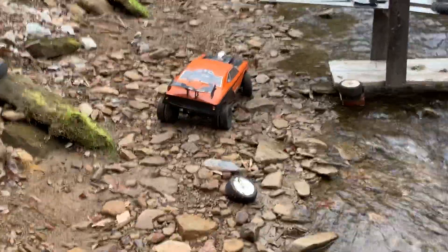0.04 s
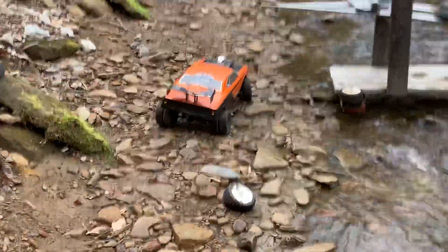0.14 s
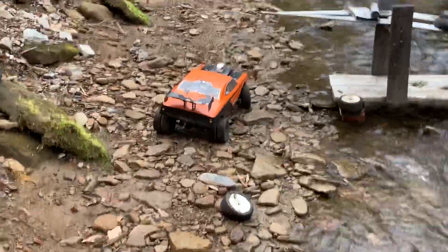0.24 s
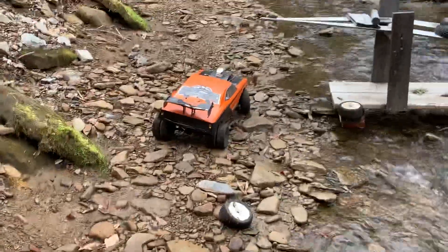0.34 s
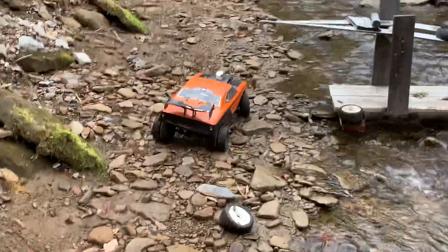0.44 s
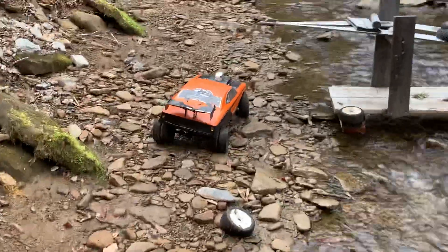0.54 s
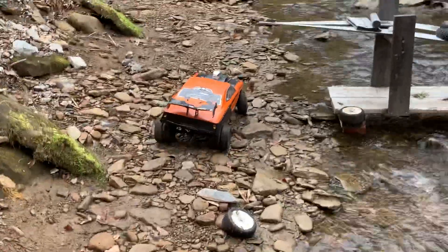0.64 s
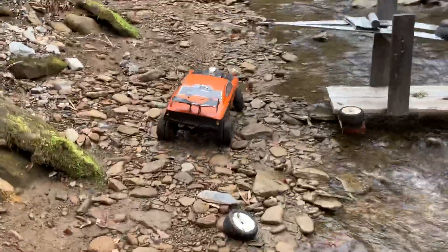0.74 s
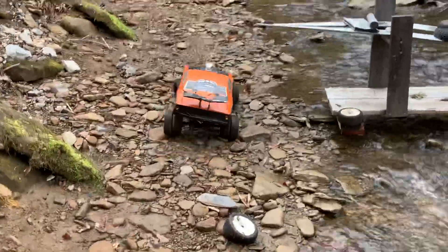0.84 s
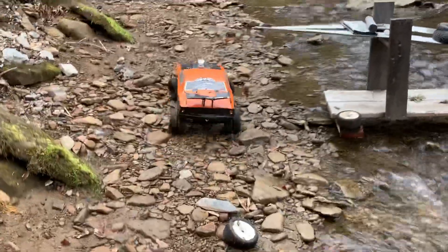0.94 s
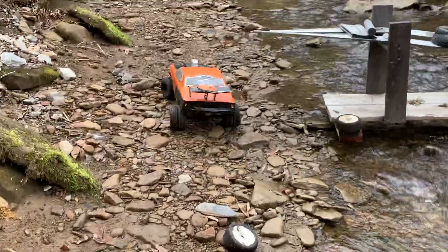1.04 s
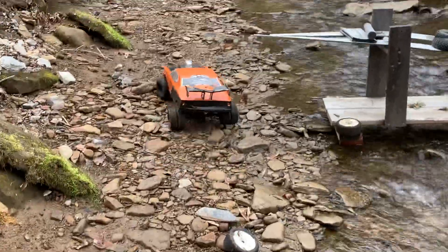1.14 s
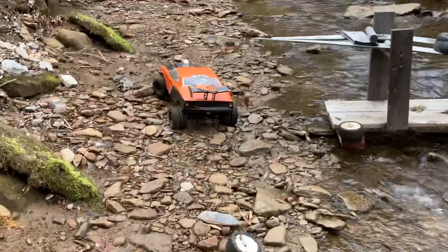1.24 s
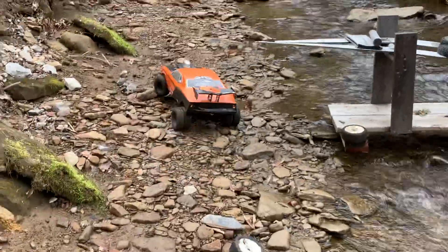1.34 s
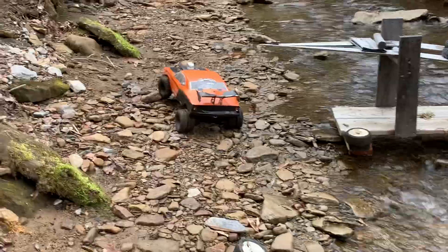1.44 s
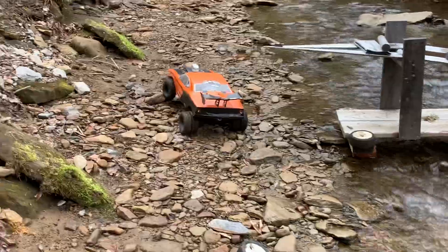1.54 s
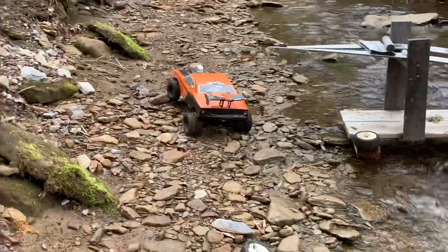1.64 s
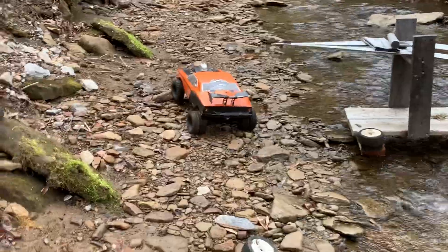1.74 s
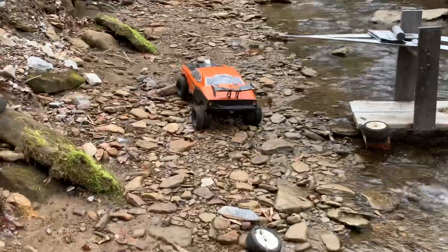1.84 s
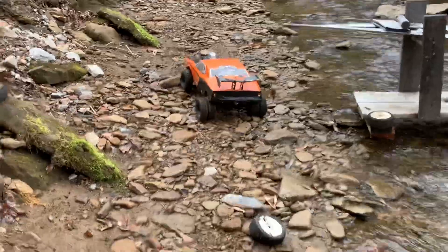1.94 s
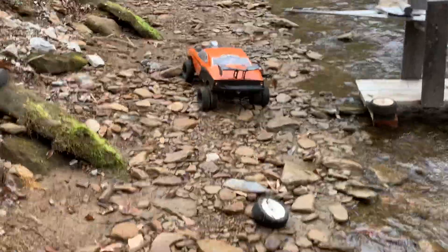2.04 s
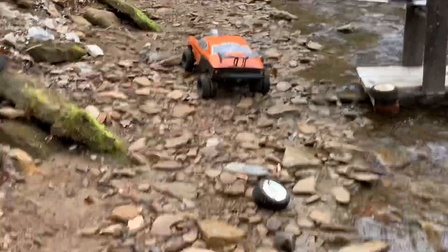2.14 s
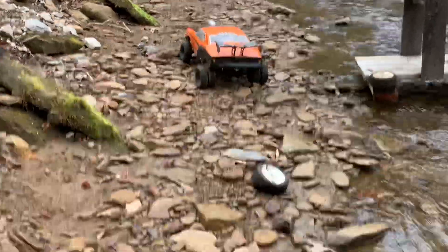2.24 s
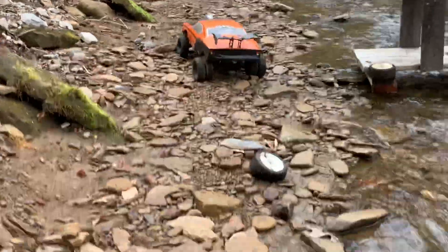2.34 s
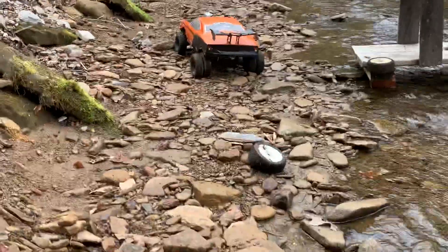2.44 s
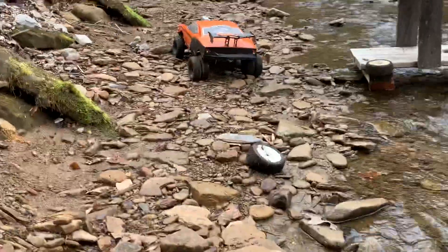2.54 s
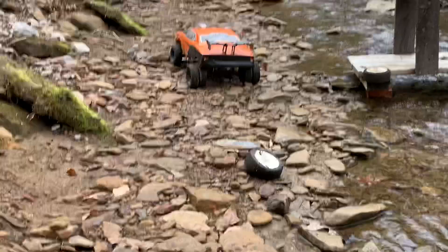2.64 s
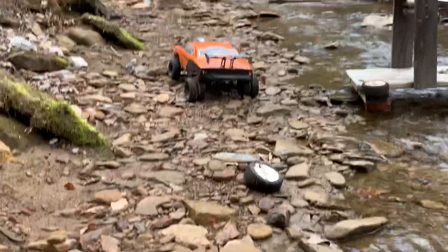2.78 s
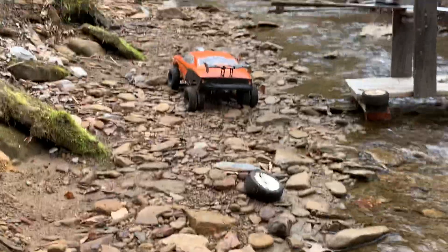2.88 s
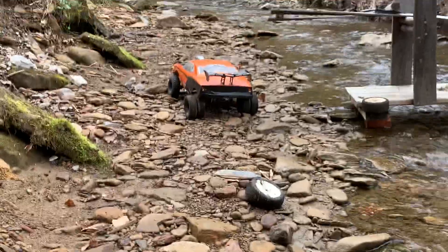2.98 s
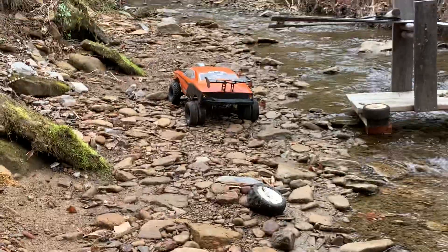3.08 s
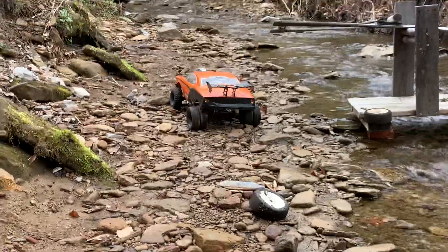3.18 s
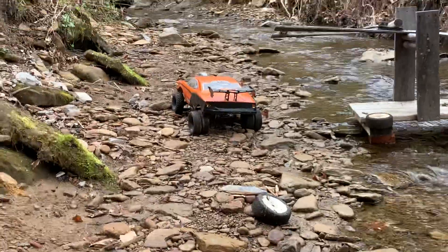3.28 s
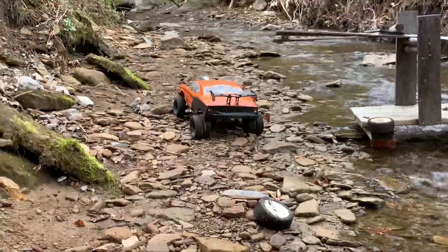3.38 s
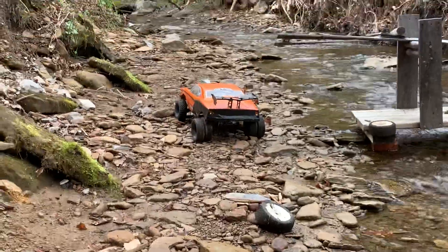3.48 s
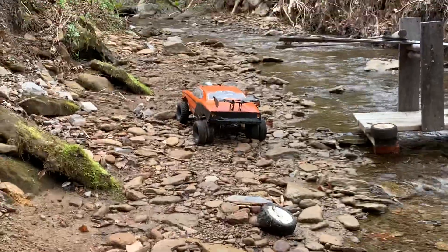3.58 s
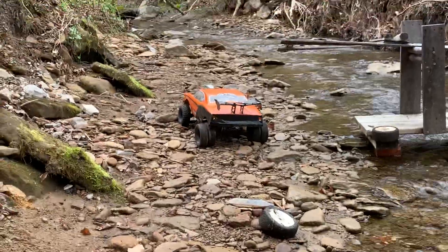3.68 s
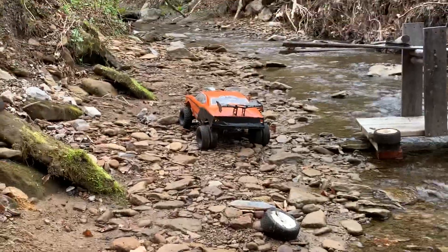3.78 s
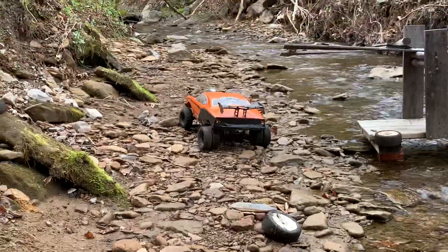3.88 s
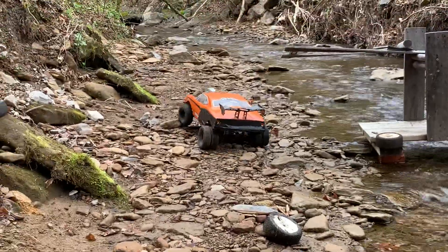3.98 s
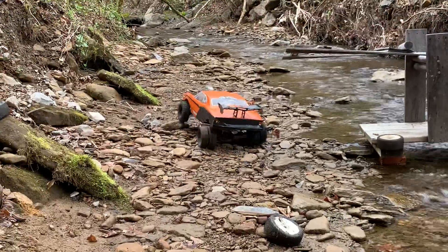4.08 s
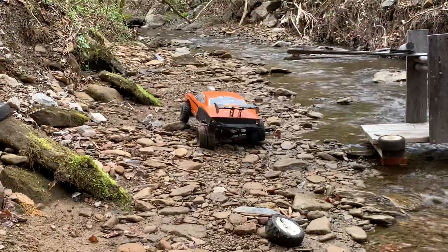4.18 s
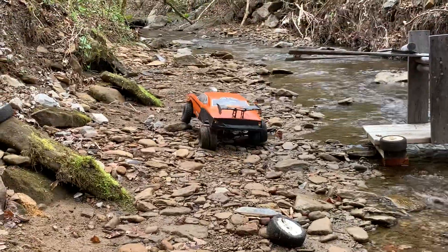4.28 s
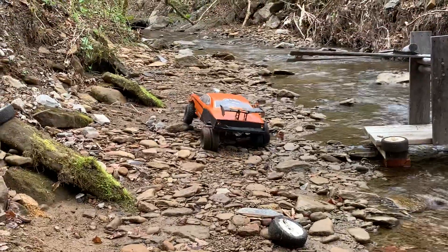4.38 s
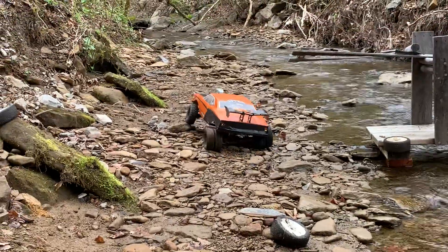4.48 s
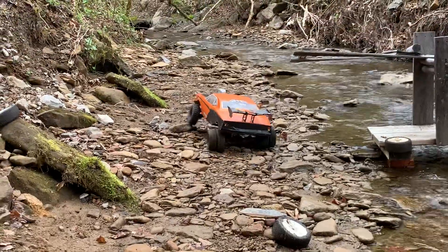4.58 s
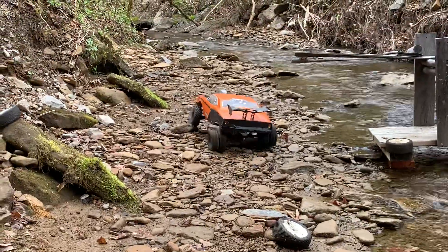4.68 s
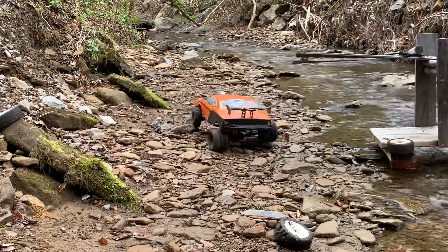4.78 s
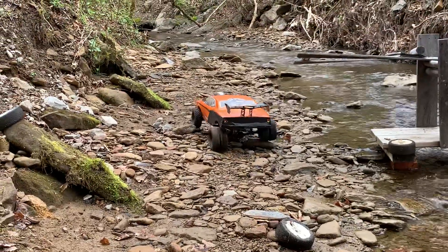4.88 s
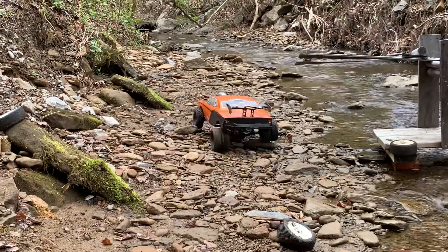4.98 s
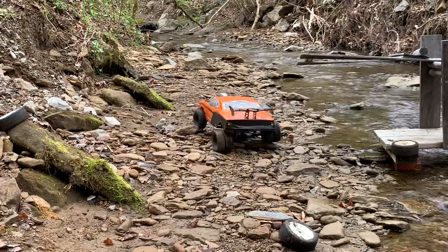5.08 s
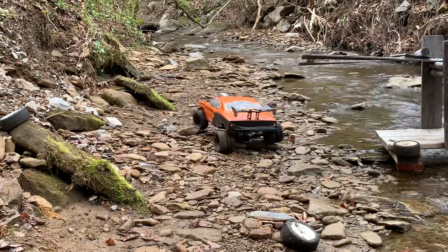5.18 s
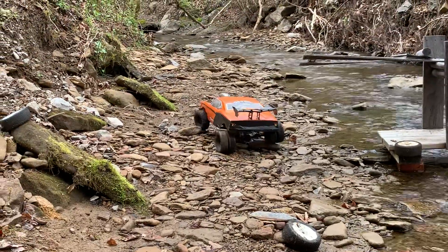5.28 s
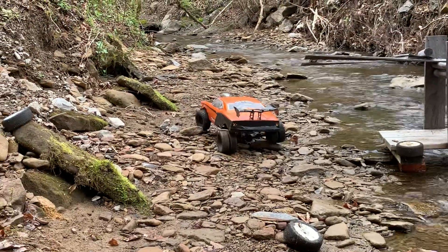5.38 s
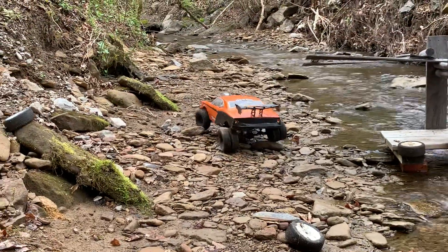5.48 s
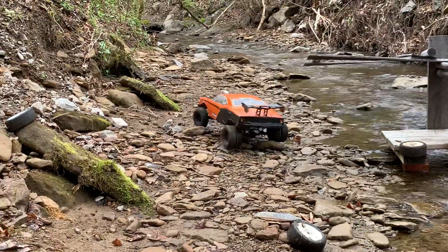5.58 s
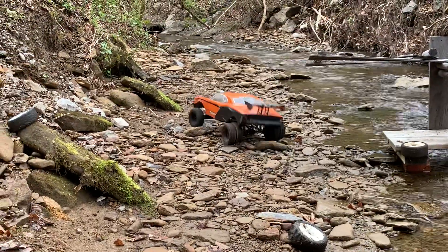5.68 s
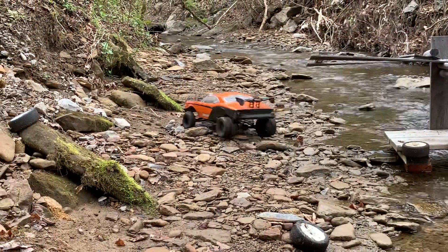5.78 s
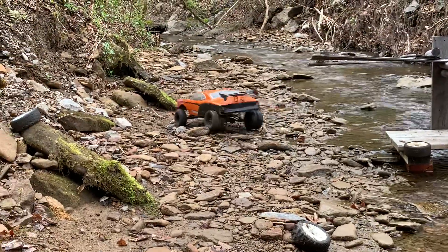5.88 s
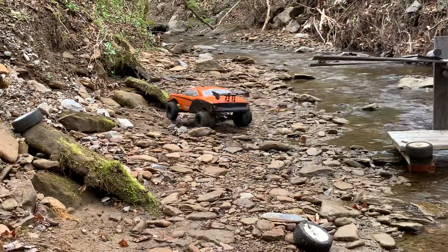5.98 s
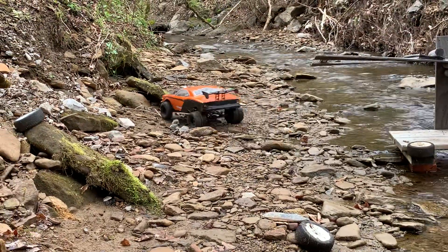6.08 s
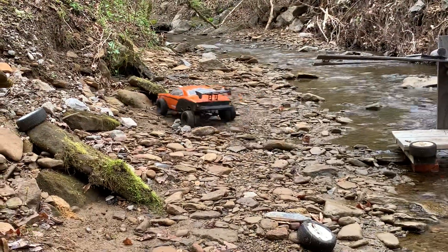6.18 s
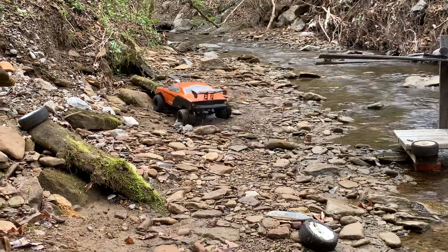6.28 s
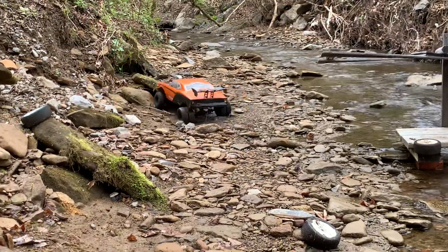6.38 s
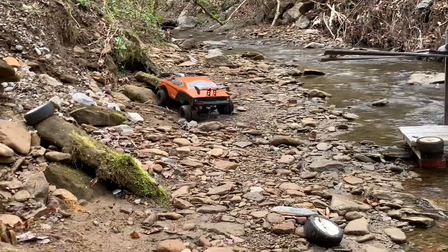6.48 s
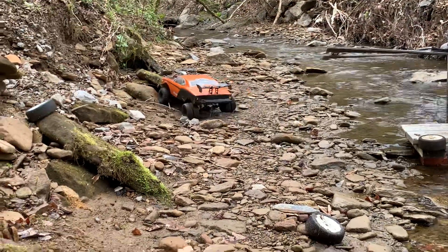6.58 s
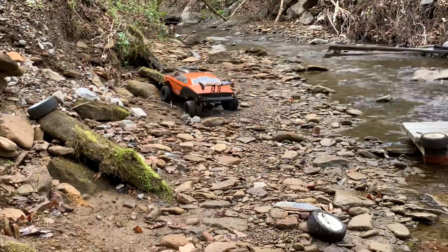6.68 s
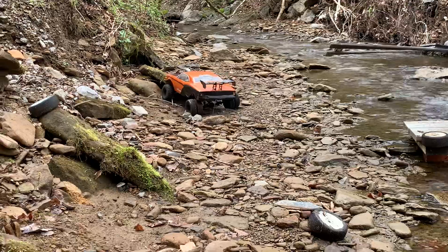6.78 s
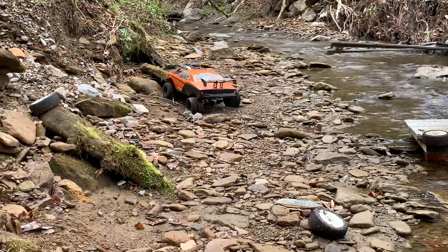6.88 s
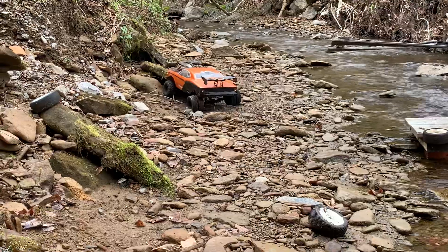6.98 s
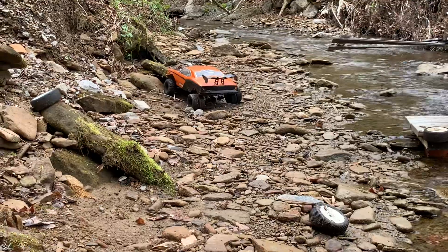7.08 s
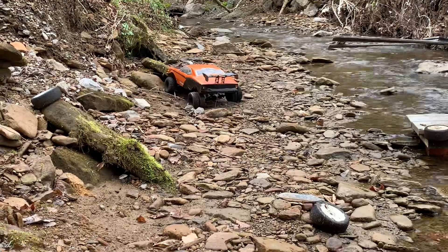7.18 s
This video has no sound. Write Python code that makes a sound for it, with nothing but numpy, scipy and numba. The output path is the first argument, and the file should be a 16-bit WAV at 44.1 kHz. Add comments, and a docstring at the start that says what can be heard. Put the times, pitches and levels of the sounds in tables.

```python
"""A small remote-controlled truck is heard at once, grinding loose stones as creek water bubbles alongside.
It drives in spurts: dense random impacts, coloured by gravel, shell and chassis, with clacking stones.
The steering whines twice as fluttering sines, first around one high pitch, then gliding up and partly back.
The water is dying tones over a fizz of tiny impacts.
Low sine bumps and filtered noise shake the hand-held phone."""
import sys
import numpy as np
from scipy import signal
from scipy.fft import rfft, irfft, next_fast_len
from scipy.io import wavfile
from scipy.ndimage import uniform_filter1d
from numba import njit

SR = 44100
rng = np.random.default_rng(int(sys.argv[2]) if len(sys.argv) > 2 else 0)


def wrap_up_sound(samples):
    """Save the sound to the file named by the first command line argument, as 16-bit audio."""
    columns = np.atleast_2d(samples).T
    # keep every value between -1 and 1, then stretch to whole-number steps
    tamed = np.clip(columns, -1, 1)
    steps = np.round(tamed * 32767).astype(np.int16)
    wavfile.write(sys.argv[1], SR, steps)


N = 318843
T = np.arange(N) / SR  # time axis [s]
PADDED = next_fast_len(N, True)
HZ = np.maximum(np.fft.rfftfreq(PADDED, 1 / SR), 1)  # frequency axis [Hz]

# low bumps on the phone: (time [s], relative level [dB])
BUMPS = [(.403, -44), (.495, -40), (1.469, -48), (1.56, -35), (1.619, -42), (2.241, -43.5), (3.204, -40),
         (4.574, -34.5), (6.717, -47)]
# gain of the running water: (time [s], gain [dB])
FLOW = [(0, -4.5), (.5, 4), (1.5, 2.5), (2.2, 3), (2.75, 2), (3.1, .5), (4.3, 3.5), (4.45, 1.5), (6.4, 4),
        (6.8, -0.5), (7.2, 1.5)]
# colour of the running water: (frequency [Hz], gain [dB])
WATER_COLOUR = [(60, -33), (180, 7.5), (300, -2.5), (480, -1), (650, -2.5), (950, 3.5), (2200, -3),
                (3200, -2), (5500, -2.5), (7800, -10), (10500, -8.5), (15500, -11.5)]
# the loudest bubbles: (time [s], relative level [dB], pitch [Hz])
PLOPS = [(.041, -34.5, 1230), (.066, -36, 1396), (.124, -42.5, 1440), (.248, -38.5, 2305),
         (1.232, -35, 1587), (1.342, -38, 1349), (1.432, -37.5, 1180), (1.49, -41, 1280),
         (1.716, -46, 2020), (1.772, -39.5, 905), (2.051, -36, 3790), (2.204, -43, 1990),
         (2.252, -49, 1850), (2.343, -44.5, 2150), (2.483, -48, 680), (2.602, -44.5, 2200),
         (2.631, -42, 1200), (2.636, -43, 1990), (2.648, -33, 980), (2.657, -42, 1840), (2.668, -44, 1450),
         (2.677, -49, 442), (2.699, -45, 1570), (2.721, -41, 2070), (2.736, -39, 2470),
         (2.748, -38.5, 2930), (2.778, -40, 924), (2.786, -45, 2250), (2.807, -43, 1880),
         (2.835, -38.5, 3700), (2.913, -35, 2970), (3.121, -46.5, 1970), (3.245, -49, 1860),
         (3.33, -47, 2080), (3.357, -46, 2180), (3.408, -53, 256), (3.486, -44.5, 1950), (3.498, -39, 2296),
         (4.147, -40, 1220), (4.189, -39, 1390), (4.262, -35.5, 3100), (4.266, -38.5, 2410),
         (4.294, -41.5, 1440), (4.316, -41, 2590), (4.342, -44.5, 2140), (4.384, -48, 2000),
         (4.884, -36, 2660), (4.997, -40.5, 1503), (5.084, -35, 2610), (5.116, -53, 1254),
         (5.253, -45, 2070), (5.27, -41, 2120), (6.368, -37.5, 2091), (6.507, -42, 2090),
         (6.538, -41.5, 2200), (6.594, -44, 2006), (6.845, -38.5, 1323), (7.128, -49, 2190)]
# fine drips at the water's edge: (time [s], relative level [dB], pitch [Hz])
DRIPS = [(2.116, -40, 7100), (4.222, -43.5, 4400), (4.355, -53, 6000), (5.026, -31, 3600),
         (5.029, -27, 3120), (5.033, -40, 5200), (6.645, -38, 3950), (6.683, -43, 4700), (6.757, -47, 5040),
         (6.838, -47, 6700), (6.907, -50, 6350), (7.118, -53, 5400)]
# the steering works:
# (time [s], length [s], top fundamental [Hz], arch of the pitch [0-1], harmonic [number], relative level [dB])
WHINES = [(4.16, 0.17, 7980, 0, 1, -51), (5.034, .1, 2165, 0.14, 2, -42),
          (5.034, .098, 2180, 0.17, 3, -49.5)]
# the loudest stones knocked and shifted: (time [s], relative level [dB], ring [Hz], decay by 60 dB [s])
STONES = [(.114, -41, 2000, .022), (0.216, -41.5, 2384, 0.039), (.282, -44, 847, 0.26),
          (.76, -33, 1300, 0.082), (.77, -41.5, 530, .45), (.918, -37, 1920, 0.081),
          (1.308, -38, 2470, 0.026), (1.843, -47.5, 925, 0.22), (2.114, -45, 1310, 0.1),
          (2.126, -41, 3900, 0.15), (2.143, -49, 800, .12), (2.185, -47.5, 2260, 0.2),
          (3.757, -47.5, 3000, 0.049), (4.362, -48.5, 6800, 0.035), (4.526, -46, 943, 0.065),
          (4.664, -28.5, 1670, 0.071), (4.925, -43, 1420, 0.048), (5.006, -42, 3800, 0.02),
          (5.144, -42.5, 1110, 0.07), (5.159, -45.5, 2220, 0.076), (5.28, -39, 1850, 0.033),
          (5.56, -31.5, 2450, .05), (5.674, -26, 2300, 0.15), (5.843, -31, 1800, .07),
          (6.268, -27.5, 4770, 0.025), (6.288, -32, 2420, 0.061), (6.382, -36.5, 1090, 0.07),
          (6.446, -41.5, 1190, 0.1), (6.712, -43.5, 690, 0.025)]
# the sharpest ticks of grit: (time [s], relative level [dB])
TICKS = [(0.224, -37.5), (1.844, -35.5), (2.648, -39), (4.524, -42), (4.926, -41), (5.387, -40),
         (6.267, -39), (6.575, -28.5), (6.742, -38.5)]
# the chassis bottoms on its springs: (time [s], relative level [dB], ring [Hz])
JOLTS = [(.533, -40.5, 144), (2.128, -50, 250), (5.146, -51, 320), (6.264, -38.5, 256), (6.298, -35, 250),
         (6.382, -41.5, 300)]
# colour of grinding gravel: (frequency [Hz], gain [dB])
GRAVEL_COLOUR = [(80, -13), (130, -15), (190, -10), (300, -8.5), (600, -3.5), (1100, -0.5), (1900, -2),
                 (2200, -2.5), (2400, 1.5), (2800, -6.5), (4100, -4), (5300, -6), (6600, -7.5),
                 (7500, -25.5), (10500, -12.5), (15500, -21.5)]
# resonances of shell and chassis, before squaring: (frequency [Hz], width [Hz], gain after squaring [dB])
SHELL = [(1144, 330, 4.5), (1684, 150, 10), (2487, 145, 7.5), (3060, 150, 5), (4800, 250, 0.5),
         (5940, 250, 2.5), (6450, 250, -6.5)]
# the truck rolls over gravel: (time [s], length [s], relative gravel level [dB], relative drumming level [dB])
RUNS = [(0, 0.37, -51.5, -90), (0.585, 0.39, -49, -58.5), (1.035, .34, -50, -72),
        (3.855, 0.19, -49.5, -57.5), (4.576, 0.55, -56.5, -63.5), (5.52, 0.812, -47, -54.5),
        (6.4, 0.053, -49, -60), (6.552, 0.14, -54, -78)]
# bursts of throttle spin the wheels:
# (time [s], length [s], relative level [dB], rise [dB/s], fall [dB/s], ring of the stones underneath [Hz])
SPURTS = [(0.752, 0.13, -33, 193, 76, 2110), (3.906, 0.089, -43, 119, 69.5, 826),
          (4.616, 0.052, -32.5, 267, 110, 1120), (5.035, 0.048, -55, 200, 198, 1470),
          (5.447, 0.035, -45.5, 400, 102, 2014), (5.497, 0.025, -34.5, 301.5, 100, 980),
          (5.559, 0.15, -31.5, 303, 85, 2470), (5.823, 0.02, -33, 190, 223, 880),
          (6.268, 0.032, -36.5, 850, 502, 2400)]
# nearby rocks: (delay at the start [s], change of delay over the whole drive [s], gain [dB])
ECHOES = [(.0016, -0.0061, -8), (.0029, -0.0095, -13), (.0052, .0016, -12.5)]
# left port against right port, truck then creek: (frequency [Hz], gain [dB])
TRUCK_BALANCE = [(250, 0.5), (420, -4), (620, -15.5), (1200, -5.5), (2400, -8), (3400, -7.5), (4700, -8),
                 (5650, -40), (6400, -3.5), (7400, 0)]
CREEK_BALANCE = [(550, 0.5), (1000, -7), (2000, 0), (3000, -2), (5700, -8), (7200, 1)]
# how far left leads right, truck then creek: (frequency [Hz], phase [rad])
TRUCK_PHASE = [(170, 0.5), (330, -1.4), (560, 1.5), (690, -6), (750, -5.5), (1000, -5.5), (1900, -5.5),
               (3200, -4.5), (4500, -5), (6800, -6.5), (8400, -10), (11000, -12), (13300, -16.5),
               (15600, -17)]
CREEK_PHASE = [(200, -.8), (750, -3.1), (2100, -1.1), (3400, -3.1), (4500, -5.5), (6800, -6.7),
               (8400, -9.4), (11000, -12.6), (13300, -15.7), (15600, -18.8)]

TOP_HZ = 15900
BUMP_HZ, BUMP_T60_S = 65, .12
AIR_DB = -71  # steady rumble of air at the phone
# one gust rises quickly and ebbs slowly
GUST_S, GUST_DB, GUST_RISE_DB_PER_S, GUST_FALL_DB_PER_S = 1.55, -58, 57, 4.5
# lesser plops scatter about one relative level and pitch
PLOP_DB, PLOP_SPREAD_DB, PLOP_HZ, PLOP_SPREAD_OCTAVES = -49, 1.5, 1940, 0.297
# small bubbles shed by each plop: scatter of lag, relative level, scatter of pitch
SHED_S, SHED_DB, SHED_OCTAVES = .022, -12.5, 0.305
WHINE_TOP = .55  # share of its length after which an arched whine is highest
WHINE_SAG = .8  # how far an arched pitch falls again, as a share of its rise
TICK_HZ, JOLT_T60_S = 9800, 0.15
# a sliding stone: share of its decay spent building up; unevenness and spacing of its contacts
SETTLE_SHARE, CHATTER_DB, CHATTER_S = .025, 1, 0.0018
BED_DB, BED_WIDTH_HZ = -9.5, 88  # stones ringing under a spurt: relative level, width of resonance
SLIP_DB = 1.18  # flutter of the tread's grip
RUN_RISE_DB_PER_S, RUN_FALL_DB_PER_S = 200, 101
CHASSIS_DB_PER_DB = 0.29  # wheelspin shakes the chassis harder


def undb(db):
    """Decibels to gain."""
    return 10 ** (np.asarray(db) / 20)


def decibels(power):
    """Power to decibels."""
    return 10 * np.log10(power + 1e-12)


def unit(x):
    """Scale to rms 1."""
    return x / np.sqrt(np.mean(x ** 2))


def curve(rows):
    """Join (time [s], value) rows by straight lines."""
    return np.interp(T, *np.transpose(rows))


def across(rows):
    """Join (frequency [Hz], value) rows on a log-frequency axis."""
    hz, value = np.transpose(rows)
    return np.interp(np.log(HZ), np.log(hz), value)


def shape(x, response):
    """Filter by a frequency response."""
    return irfft(rfft(x, PADDED) * response, PADDED)[:N]


def resonance(hz, width):
    """Response of one resonance, gain 1 at its centre."""
    return 1 / (1 + 1j * (HZ ** 2 - hz ** 2) / (HZ * width))


def ring(x, hz, q):
    """Pass through one resonance."""
    return signal.lfilter(*signal.iirpeak(min(hz, SR / 3), max(q, 1), SR), x)


def walk(rate):
    """Random levels held 1 / rate s and slewed twice; spread near 1."""
    hold = int(SR / rate)
    steps = np.repeat(rng.standard_normal(N // hold + 1), hold)
    return unit(uniform_filter1d(uniform_filter1d(steps, hold), hold)[:N])


def surge(s, length, db, rise, fall):
    """Power that rises (dB per s) to a level at time s, holds it for a length and falls (dB per s)."""
    before, after = np.maximum(s - T, 0), np.maximum(T - s - length, 0)
    return undb(db - rise * before - fall * after) ** 2


def add(out, s, x):
    """Mix a short sound in at time s."""
    i = max(int(s * SR), 0)
    out[i:i + len(x)] += x[:max(N - i, 0)]


def fade(t60):
    """Times and gains of a ring that dies by 60 dB."""
    t = np.arange(int(t60 * SR) + 2) / SR
    return t, np.exp(-np.log(1000) * t / t60)


def rattle(hz, t60, q, crack):
    """A dying burst of uneven contacts: a broad ring plus a share of raw crack."""
    t, decay = fade(t60)
    noise, grip = rng.standard_normal((2, len(t)))
    uneven = np.interp(t / CHATTER_S, np.arange(len(t)), np.clip(grip, -2, 2))
    noise = unit(noise * undb(CHATTER_DB * uneven))
    return (unit(ring(noise, hz, q)) + crack * noise) * decay


def grains(rate, spread_db):
    """Random tiny impacts of uneven size, rate a second, evened out in power and scaled to rms 1."""
    hit = rng.random(N) < rate / SR
    kick, size = rng.standard_normal((2, N))[:, hit]
    out = np.zeros(N)
    out[hit] = kick * undb(spread_db * np.clip(size, -2, 2))
    return unit(out / np.sqrt(rate))


@njit
def rings(rows, length, swell):
    """Dying tones swelling in: (time [s], pitch [Hz], decay [s], rise [share of pitch], gain) rows."""
    out = np.zeros(length)
    for k in range(len(rows)):
        s, hz, t60, glide, gain = rows[k]
        first, steps = max(int(s * SR), 0), int(t60 * SR) + 1
        turn = np.exp(2j * np.pi * hz / SR - np.log(1000) / steps)
        bend = np.exp(2j * np.pi * hz * glide / SR / steps)
        # swell is the time constant of the onset in cycles
        z, rest, ease = gain + 0j, 1., np.exp(-hz / (swell * SR))
        for i in range(first, min(first + steps, length)):
            z, turn, rest = z * turn, turn * bend, rest * ease
            out[i] += z.imag * (1 - rest)
    return out


def ports(direct, wide, balance, phase, width):
    """Two microphone ports: the direct sound reaches both, the widely spread part differs between them."""
    share = width / (1 + (HZ / 7500) ** 4)
    direct = shape(direct, 1 / np.sqrt(1 + share ** 2))
    wide = shape(wide, share / np.sqrt(1 + share ** 2))
    left = shape(direct + wide, undb(across(balance)) * np.exp(1j * across(phase)))
    return np.array([left, direct - wide])


def handling():
    """Air and the holding hand shake the phone: low sine bumps out of phase, separate rumble at each port."""
    bumps = np.zeros(N)
    t, decay = fade(BUMP_T60_S)
    thump = np.sin(2 * np.pi * BUMP_HZ * t) * decay * 2 * (1 - np.exp(-t / .01))
    for s, db in BUMPS:
        add(bumps, s, undb(db) * thump)
    rumble = resonance(57.4, 45.4) ** 2
    air = np.array([unit(shape(rng.standard_normal(N), rumble)) for _ in range(2)])
    gust = surge(GUST_S, 0, GUST_DB, GUST_RISE_DB_PER_S, GUST_FALL_DB_PER_S)
    return np.array([shape(bumps, np.exp(1.7j)), bumps]) + air * np.sqrt(undb(AIR_DB) ** 2 + gust)


def creek(count=3400):
    """Overlapping bubbles of all sizes over the fizzing wash of shallow riffles."""
    when, size, loud, life, slope, gap = rng.random((count, 6)).T
    s = when * N / SR
    hz = 330 * (3900 / 330) ** (size ** .6)
    gain = undb(-3.3 * np.log(1 - .97 * loud))
    t60 = (0.008 + 0.091 * life) * (1500 / hz) ** 0.37
    # most bubbles nearly hold their pitch; a few rise as they near the surface
    first = np.column_stack([s, hz, t60, 0.334 * slope ** 3, gain])
    # each pocket of air sheds another a moment later
    shed_hz = hz * (.85 + 0.33 * slope)
    second = np.column_stack([s + .02 * gap, shed_hz, 0.69 * t60, 0.16 * life, 0.52 * gain])
    colour = undb(across(WATER_COLOUR))
    babble = unit(shape(rings(np.vstack([first, second]), N, swell=4.4), colour))
    # water spills over the stones in quick gulps, bunching the bubbles
    babble = unit(babble * undb(1.14 * walk(16)))
    wash = unit(shape(grains(3500, spread_db=-1.0), colour)) * undb(2.2 * walk(70))
    return (undb(-58.0) * babble + undb(-62.0) * wash) * undb(curve(FLOW))


def plops(count=12, order=3):
    """Larger pockets of air close by, each breaking into a gurgle of smaller bubbles with a slight splash."""
    when, loud, size = rng.standard_normal((count, 3)).T
    lesser_db = PLOP_DB + PLOP_SPREAD_DB * loud
    lesser_hz = PLOP_HZ * 2 ** (PLOP_SPREAD_OCTAVES * size)
    pockets = np.vstack([PLOPS, np.column_stack([when % 1 * N / SR, lesser_db, lesser_hz])])
    s, db, hz = np.repeat(pockets, order, axis=0).T
    when, loud, size = rng.standard_normal((len(s), 3)).T
    shed_db = db + SHED_DB + 2.7 * loud
    shed = np.column_stack([s + SHED_S * np.abs(when), shed_db, hz * 2 ** (SHED_OCTAVES * size)])
    s, db, hz = np.vstack([pockets, shed]).T
    t60 = 0.044 * (1500 / hz) ** 1.05
    out = rings(np.column_stack([s, hz, t60, np.full(len(s), .12), undb(db + 3.5)]), N, swell=3.0)
    for s, db, hz in pockets:
        add(out, s, undb(db - 9.0) * rattle(hz, t60=0.045, q=12.0, crack=.05))
    return out


def trickle(count=110):
    """Tiny drips plink briefly above the babble, a few close ones among many faint ones."""
    when, loud, size = rng.random((count, 3)).T
    faint = np.column_stack([when * N / SR, -57.0 + 9.4 * loud ** 2, 2800 + 4500 * size])
    s, db, hz = np.vstack([DRIPS, faint]).T
    t60 = 0.015 * np.sqrt(4000 / hz)
    return rings(np.column_stack([s, hz, t60, np.full(len(s), .15), undb(db + 1.5)]), N, swell=1.9)


def steering():
    """A small motor whines and fades as it stops; where the pitch is arched it spins up and sags under load."""
    out, flutter = 0, 0.0139 * walk(770)
    for s, length, hz, bend, harmonic, db in WHINES:
        u = np.clip((T - s) / length, 0, 1)  # progress through the whine
        slow = np.where(u < WHINE_TOP, 1, WHINE_SAG) * (1 - u / WHINE_TOP) ** 2
        turn = 2 * np.pi * np.cumsum(hz * (1 - bend * slow + flutter)) / SR
        swell = np.sin(np.pi * u) * (1 - u ** 3)
        out = out + undb(db) * swell * np.sin(round(harmonic) * turn)
    return out * undb(2.6 * walk(220))


def knocks():
    """Stones slide and clack, grit ticks and the chassis thuds, all as dying bursts of rough contact."""
    out = np.zeros(N)
    for s, db, hz, t60 in STONES:
        clack = rattle(hz, t60, q=1.66, crack=0.18)
        settle = 1 - np.exp(-np.linspace(0, 1, len(clack)) / SETTLE_SHARE)
        add(out, s - SETTLE_SHARE * t60, undb(db + 1.5) * clack * settle)
    for s, db in TICKS:
        add(out, s, undb(db) * 0.45 * rattle(TICK_HZ, t60=0.011, q=8.5, crack=0.27))
    for s, db, hz in JOLTS:
        add(out, s, undb(db) * rattle(hz, JOLT_T60_S, q=1.96, crack=.02))
    return out


def bed():
    """Each spurt digs into other stones, which ring at a pitch of their own."""
    contacts = grains(9000, spread_db=1.0)
    stones = sum(unit(ring(contacts, hz, hz / BED_WIDTH_HZ)) * np.sqrt(surge(*burst))
                 for *burst, hz in SPURTS)
    return undb(BED_DB) * stones


def pebbles(count=7000):
    """Many small stones, each ringing briefly at its own pitch."""
    when, size, loud, life = rng.random((count, 4)).T
    hz = 700 + 8000 * size ** 1.2
    rows = np.column_stack([when * N / SR, hz, 0.0086 + 0.05 * life, 0 * life, undb(11.4 * loud)])
    return unit(rings(rows, N, swell=0.25))


def driving():
    """Levels in dB of gravel and chassis: the truck rolls, and each burst of throttle lifts both."""
    rates = RUN_RISE_DB_PER_S, RUN_FALL_DB_PER_S
    roll = sum(surge(s, length, db, *rates) for s, length, db, _ in RUNS)
    drum = sum(surge(s, length, db, *rates) for s, length, _, db in RUNS)
    spin = sum(surge(*burst) for *burst, _ in SPURTS)
    drive_db = decibels(roll + spin)
    return drive_db, decibels(drum) + CHASSIS_DB_PER_DB * (drive_db - decibels(roll))


def tyres(drive_db, chassis_db):
    """Harder drive breaks more contacts a second; they hiss directly and ring the shell, over a drumming chassis."""
    rate = 22000 * undb(.6 * (drive_db + 30))
    colour = undb(across(GRAVEL_COLOUR)) / (1 + (60 / HZ) ** 4)
    shell = sum(undb(db) * np.abs(resonance(hz, width)) ** 2 for hz, width, db in SHELL)
    grind = unit(shape(grains(rate, spread_db=3.0) + undb(-6.5) * pebbles(), colour))
    # the shell sings through the hiss
    singing = unit(shape(grains(rate, spread_db=2.5), shell))
    grind = unit(grind + undb(-7.5) * singing)
    # spinning wheels throw sand, which brightens the hardest spurts
    sand = unit(shape(grains(15000, spread_db=3.5), resonance(5580, 930)))
    sand = sand * undb(-6.0 + 1.24 * (drive_db + 32))
    chassis = unit(shape(grains(900, spread_db=4.0), resonance(288, 330) ** 2)) * undb(chassis_db)
    # the tread grips and slips from stone to stone
    slip_db = SLIP_DB * walk(110)
    return (grind + sand) * undb(drive_db + slip_db) + chassis


def rocks(x, drive_db):
    """Nearby rocks reflect the truck; shifting delays move the comb bands as it drives."""
    travel = np.cumsum(undb(drive_db / 2))
    travel = travel / travel[-1]
    # a delay that turns negative puts its copy ahead of the direct sound
    copies = sum(undb(db) * np.interp(T - delay - change * travel, T, x) for delay, change, db in ECHOES)
    return (x + copies) * undb(-1.0)


def scene():
    """Truck and creek, each with its own balance and phase between the ports, plus handling."""
    drive_db, chassis_db = driving()
    direct, wide = (rocks(tyres(drive_db, chassis_db), drive_db) for _ in range(2))
    hits = shape(knocks(), 1 / (1 + (90 / HZ) ** 4))
    truck = ports(direct + bed() + hits + steering(), wide, TRUCK_BALANCE, TRUCK_PHASE, width=0.23)
    water = ports(creek() + plops() + trickle(), creek(), CREEK_BALANCE, CREEK_PHASE, width=0.49)
    return truck + water + handling()


def record(dry):
    """The phone cuts the top with a steep low-pass."""
    return signal.sosfilt(signal.ellip(10, .2, 70, TOP_HZ, fs=SR, output="sos"), dry)


dry = scene()
out = record(dry)
wrap_up_sound(out)
```